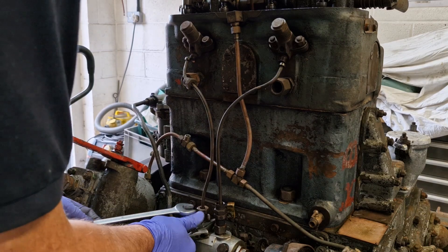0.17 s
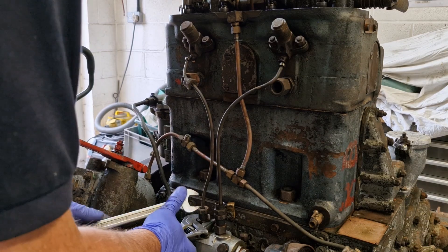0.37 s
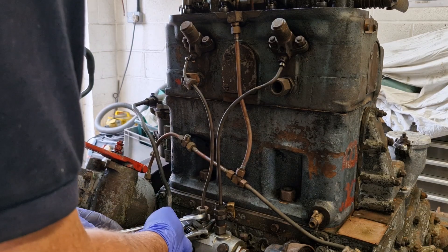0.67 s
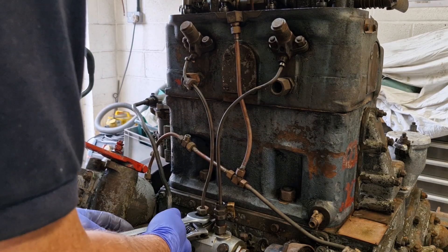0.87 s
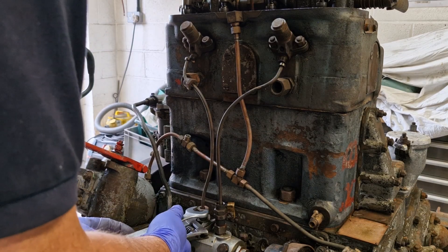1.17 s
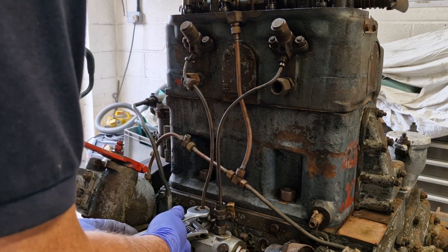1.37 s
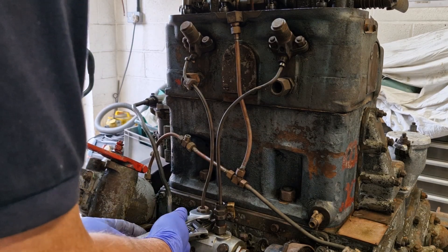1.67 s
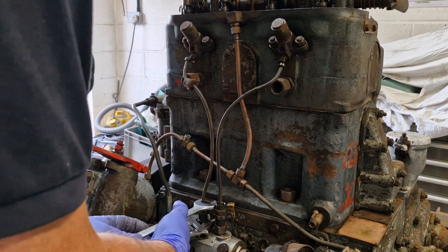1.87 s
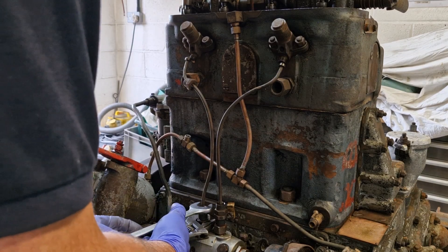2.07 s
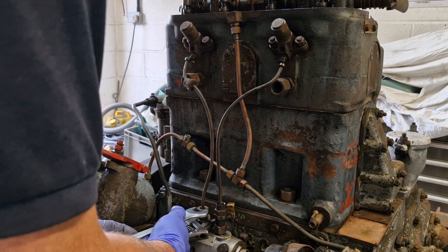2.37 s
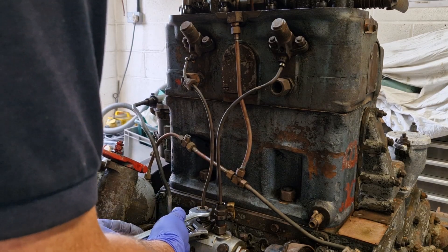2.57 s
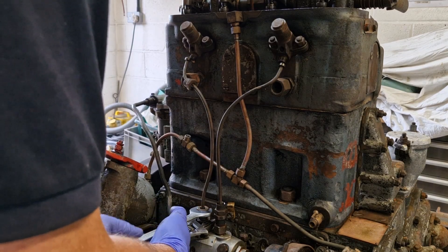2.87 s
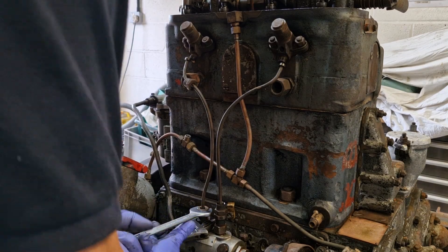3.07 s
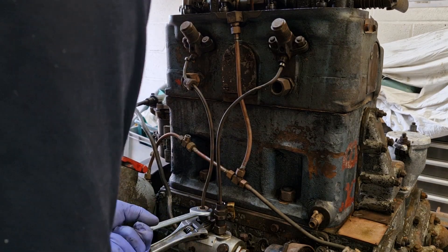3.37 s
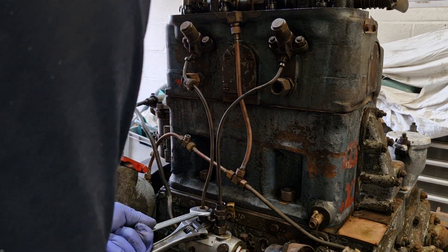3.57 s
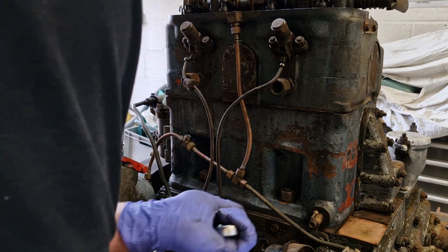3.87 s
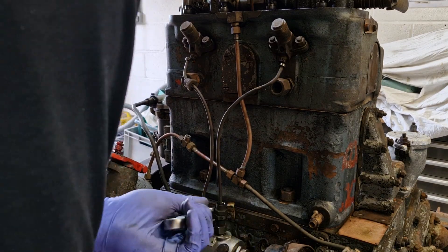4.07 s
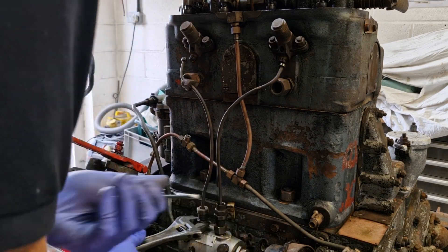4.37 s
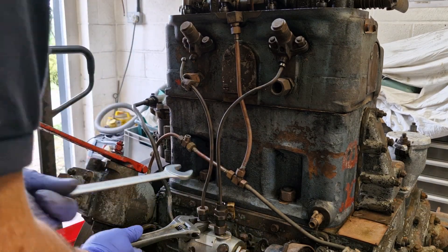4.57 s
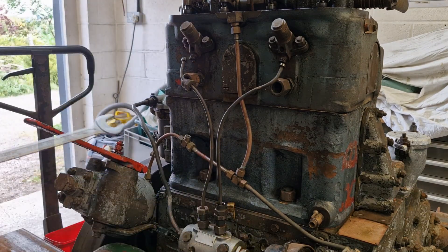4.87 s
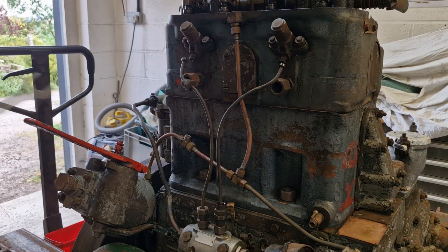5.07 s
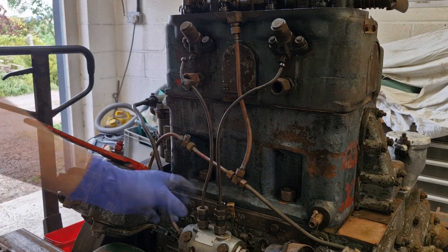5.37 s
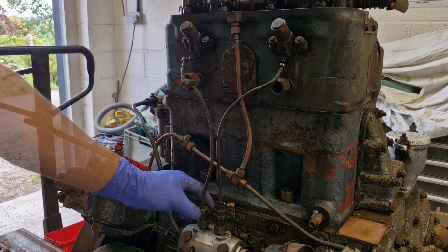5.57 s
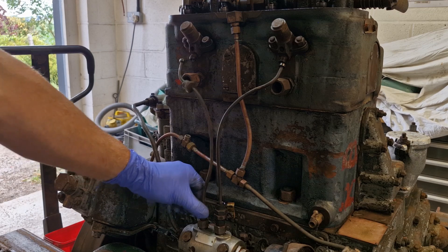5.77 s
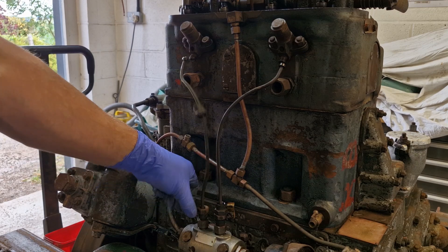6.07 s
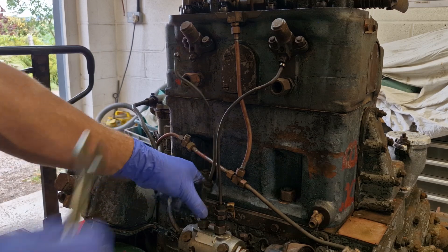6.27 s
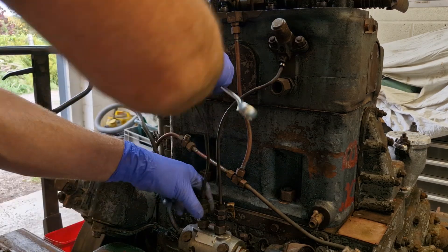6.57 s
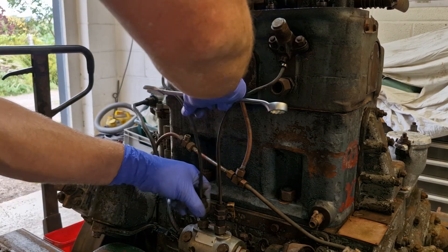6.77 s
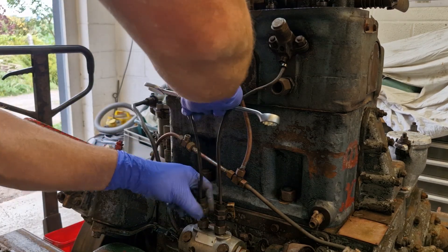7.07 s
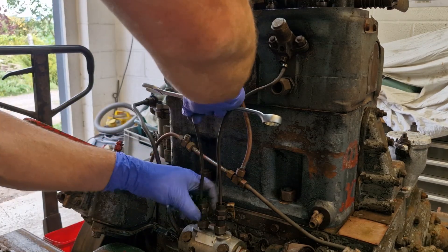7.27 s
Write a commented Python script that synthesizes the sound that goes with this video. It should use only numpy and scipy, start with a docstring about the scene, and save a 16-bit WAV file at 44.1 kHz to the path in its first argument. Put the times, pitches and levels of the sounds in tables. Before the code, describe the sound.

Close stereo pickup of hand tools on an old engine: a cluster of hard knocks and loose clinks, two solid thuds into the block, then very quiet jiggling and rubber-glove rustle. A jaw squeaks off the nut, soles shuffle on the floor, and a heavy spanner is dragged with grinding, skipping and high ringing. One more bright clank ends in light ticks and rustling. Distant pigeon coos and faint chirps, short hard-room reverberation.

```python
"""Spanner jaws clink on the nuts of a diesel fuel pipe union and knock through pipes into the block; pigeon and
small bird call outside the open door. Gloves rustle, a jaw squeaks, shoes shuffle, a long ring spanner is dragged
off a bench, ringing and clashing. Contacts: whitened noise cracks plus decaying modes; friction: uneven grains;
squeaks and calls: wavering sines. All but the air wash, floor thump and low air flutter get a noise-built room."""
import sys
import numpy as np
from scipy import signal
from scipy.fft import rfft, irfft
from scipy.io import wavfile
from scipy.ndimage import uniform_filter1d

SR = 44100
rng = np.random.default_rng(int(sys.argv[2]) if len(sys.argv) > 2 else 0)


def store_pcm(level_fs):
    """Save levels as 16-bit WAV."""
    pcm = np.round(np.clip(level_fs, -1, 1) * 32767).astype(np.int16)
    wavfile.write(sys.argv[1], SR, np.atleast_2d(pcm).T)


N = 327663
T = np.arange(N) / SR
CUT_HZ = 16200
AIR_DB = -68.5
# left minus right
ENGINE_PAN_DB, BENCH_PAN_DB = 1.5, 2.5
# thud, knock, clank, tick ranges: low edge/Hz, high edge/Hz
RANGES_HZ = [(150, 600), (600, 1500), (1500, 5000), (5000, 15000)]
# seated jaw: level/dB in each of the four ranges
KNOCK_DB = (-9.5, -1.5, -9.5, -25)
# modes of the long ring spanner, hanging free: f/Hz, level/dB, t60/s
RING_SPANNER_MODES = [(2455, -4, .3), (4038, 0, 1.2), (4743, 0, .45), (5469, -4, .2), (5868, -3, .6),
                      (7092, -1, .55), (7112, -1, .4), (7747, -2, .45), (8799, -10, .45), (9220, -10, 1.0),
                      (9800, -4, .3), (10800, -4, .2), (11203, -5, .5), (12146, -4, .65), (13150, -2, .14),
                      (14207, -8, .4), (14690, -11, .4), (15400, -6, .25)]


def undb(db):
    """Decibels to gain."""
    return 10 ** (np.asarray(db) / 20)


def unit(x):
    """Scale to rms 1."""
    return x / np.sqrt(np.mean(x ** 2) + 1e-30)


def band(x, lo_hz, hi_hz, order=4):
    """Causal band-pass."""
    sos = signal.butter(order, [lo_hz, min(hi_hz, SR / 2 - 1)], "band", fs=SR, output="sos")
    return signal.sosfilt(sos, x)


def colour(x, points):
    """Shape a steady sound by (f/Hz, level/dB) points, linear in log f."""
    hz, db = np.transpose(points)
    f = np.fft.rfftfreq(x.shape[-1], 1 / SR) + 1
    gain = undb(np.interp(np.log(f), np.log(hz), db))
    return irfft(rfft(x) * gain, x.shape[-1])


def add(out, start_s, x):
    """Mix x into out from start_s."""
    i = int(start_s * SR)
    out[..., i:i + x.shape[-1]] += x[..., :N - i]


def fade(t, t60):
    """Exponential decay, 60 dB down after t60."""
    return np.exp(-np.log(1000) * t / t60)


def panned(x, pan_db):
    """Lean a stereo sound to the left."""
    return x * undb(np.array([[pan_db], [-pan_db]]) / 2)


def air(side_db=-3):
    """Quiet outdoor wash and microphone hiss: coloured stereo noise."""
    # background spectrum: f/Hz, level/dB
    spectrum = [(25, -10), (60, 3.5), (110, -2.5), (200, -10.5), (300, 2), (450, -5), (800, -9),
                (1600, -16), (5000, -17), (9000, -23), (14000, -24), (16000, -64)]
    mid, side = colour(rng.standard_normal((2, N)), spectrum)
    return undb(AIR_DB) * unit(mid + undb(side_db) * side * np.array([[1], [-1]]))


def workshop(wet_db, lag_samples=2, treble_db=-3, build_s=0.00024, bass_hz=330):
    """Room response: direct sound, late on the right; then dense reflections, alike only in the bass."""
    # decay: f/Hz, t60/s
    decay_points = [(100, 0.35), (400, 0.46), (1200, 0.34), (4000, 0.34), (8000, 0.29), (15000, 0.23)]
    t = T[:SR // 2]
    f = np.fft.rfftfreq(len(t), 1 / SR)
    hz, t60 = np.transpose(decay_points)
    edges = np.geomspace(30, 22000, 13)
    mid, side = rfft(rng.standard_normal((2, len(t))))
    response = np.zeros((2, len(t)))
    for lo, hi in zip(edges, edges[1:]):
        apart = np.pi / 4 * hi / (hi + bass_hz)
        pair = np.cos(apart) * mid + np.sin(apart) * side * np.array([[1], [-1]])
        band_t60 = np.interp(np.log(hi), np.log(hz), t60)
        decay = fade(t, band_t60) * (1 - np.exp(-t / build_s))
        gain = undb(wet_db + treble_db * hi / edges[-1]) / np.linalg.norm(decay)
        response += gain * decay * irfft(pair * ((f >= lo) & (f < hi)), len(t))
    response[0, 0] += 1
    response[1, lag_samples] += 1
    return response


def heard(x, room):
    """A source as it reaches both microphones."""
    return signal.fftconvolve(x[None], room, axes=1)[:, :len(x)]


def weigh(x, levels_db, size):
    """Set each range's rms over the first samples: hard contacts bright, soft ones dull."""
    parts = [band(x, lo, hi) for lo, hi in RANGES_HZ]
    return sum(p * undb(db) / np.sqrt(np.mean(p[:, :size] ** 2)) for p, db in zip(parts, levels_db))


def tilted(levels_db, brightness, pivot_hz):
    """Tilt the four range levels about a pivot, brightness in dB/octave."""
    centres_hz = np.sqrt(np.prod(RANGES_HZ, axis=1))
    return np.array(levels_db) + brightness * np.log2(centres_hz / pivot_hz)


def ring(modes, t, scatter_db=0, favoured=(), favour_db=0, detune=0):
    """Decaying modes; strike place scatters their strengths and favours some; load detunes them."""
    hz, db, t60 = np.transpose(modes)
    db = db + scatter_db * rng.uniform(-2, 1, len(hz))
    hz = hz * (1 + detune * rng.standard_normal(len(hz)))
    for near_hz in favoured:
        db[np.argmin(abs(hz - near_hz))] += favour_db
    signed_gains = undb(db) * rng.choice([-1, 1], len(hz))
    return signed_gains @ (np.sin(2 * np.pi * hz[:, None] * t) * fade(t, t60[:, None]))


def chatter(rate_hz, spread_db, size=N):
    """Tiny contacts at random moments, of unequal size."""
    return (rng.random(size) < rate_hz / SR) * undb(spread_db * rng.uniform(-2, 1, size))


def rattled(t, crack_t60, rebound_db, rebound_t60=0.082):
    """Envelope of a loose jaw: one strike, then random rebounds that tend to weaken."""
    hits = undb(rebound_db) * chatter(rate_hz=490, spread_db=2.5, size=len(t)) * fade(t, rebound_t60)
    hits[0] = 1
    # each hit decays; energies add
    return np.sqrt(signal.lfilter([1], [1, -fade(2 / SR, crack_t60)], hits ** 2))


def burst(envelope):
    """Crack of one contact: enveloped noise, spectrum flattened, shaped again by the envelope's root."""
    spectrum = rfft(rng.standard_normal(len(envelope)) * envelope)
    flat = irfft(spectrum / abs(spectrum), len(envelope))
    return unit(flat * envelope ** .5)


def blow(room, levels_db, after_db, clack_hz=950, favoured=(), free_s=1, crack_t60=0.033,
         engine_db=-12, steel_db=2, clack_db=-5, clack_width=0.13, crack_lo_hz=250, dull_hz=6500,
         favour_db=7, after_favour_db=12, choke_t60=0.035, rebound_db=-15, pipe_favour_db=4):
    """Contact: crack with a broad clack, pipes and block, choked steel, after-ring choked from free_s."""
    # hand-held spanner modes: f/Hz, level/dB, t60/s
    spanner_modes = [(1600, -11, .1), (2030, -5, .08), (3100, -7, .07), (2498, -4, .28), (2758, -1, .2),
                     (3704, -5, .16), (4027, -9, .2), (4269, -3, .25), (4885, -2, .2), (5620, -5, .18),
                     (6100, -4, .2), (7033, -3, .33), (7855, -6, .17), (8230, -2, .24), (9530, -4, .24),
                     (10655, -4, .22), (11365, -4, .3), (11855, -5, .18), (12650, -1, .3), (13350, -6, .2),
                     (14620, -8, .14), (15280, -7, .15)]
    # pipe, pump and block modes: f/Hz, level/dB, t60/s
    engine_modes = [(271.3, -14, 0.17), (431.5, -11, 0.13), (703, -5, 0.052), (875, 4, 0.059),
                    (988, -0.5, 0.089), (1119, -8.5, 0.13), (1174, -2, 0.11), (1445, 1, 0.054),
                    (1644, -21, 0.69), (1968, -6.5, 0.13), (2280, -3.5, 0.078), (2680, -13, 0.29),
                    (3840, -12.5, 0.18)]
    t = T[:SR // 2]
    crack = burst(rattled(t, crack_t60, rebound_db))
    clack = unit(band(crack, clack_hz / (1 + clack_width), clack_hz * (1 + clack_width), order=2))
    pipes = unit(ring(engine_modes, t, scatter_db=2, favoured=[clack_hz], favour_db=pipe_favour_db,
                      detune=0.005))
    dull_crack = unit(band(crack, crack_lo_hz, dull_hz, order=3))
    body = unit(dull_crack + undb(clack_db) * clack + undb(engine_db) * pipes)
    # glove and nut choke the steel; favoured modes dominate the after-ring
    choke = fade(t, choke_t60)
    steel = ring(spanner_modes, t, scatter_db=1.5, favoured=favoured, favour_db=favour_db, detune=.004)
    after = ring(spanner_modes, t, scatter_db=1, favoured=favoured, favour_db=after_favour_db, detune=.001)
    after = after / np.std(after * choke) * fade(np.maximum(t - free_s, 0), choke_t60)
    steel = undb(steel_db) * unit(steel * choke) + undb(after_db) * after
    # spanner heard more directly than the engine: weaker reflections
    near = room * undb(np.where(t > .0002, -5, 0))
    return weigh(heard(body, room) + heard(steel, near), levels_db, size=1323)


def knocks():
    """Dull blows of a seated jaw: mostly pipes and block, little steel."""
    # t/s, level/dB, brightness/(dB/octave), after-ring/dB, clack f/Hz
    rows = [(.249, -34.5, 2, -15, 880), (.261, -41, 6, -11.5, 1220), (.271, -33.5, 1.5, 14, 2500),
            (.578, -41, 7, 6, 2560), (0.615, -42, 5.5, -25, 950), (1.575, -30, -1, -49, 929),
            (1.769, -48.5, 5.5, -19.5, 960), (1.789, -41, 2.5, -32, 890), (1.81, -42, -4.5, -23, 940),
            (2.53, -28, 1.5, -40, 1033), (2.772, -71.5, 3.5, -25, 1900), (3.017, -54.5, 6.5, -39, 1850),
            (3.047, -55, 3.5, -21, 1410), (4.231, -51.5, -1, -11, 880), (4.272, -54.5, 2.5, -25, 1460),
            (4.373, -52, -3.5, -27, 890), (4.383, -53.5, -2.5, -27, 930), (4.492, -60.5, -1, -32, 900),
            (4.534, -52, 2.5, -30, 920), (4.596, -60, 2, -30, 940), (5.18, -48, -2.5, -45, 745),
            (5.652, -37.5, 5, -53, 1810)]
    out, room = np.zeros((2, N)), workshop(wet_db=-2.0)
    for s, db, brightness, after_db, clack_hz in rows:
        levels_db = db + tilted(KNOCK_DB, brightness, pivot_hz=970)
        knock = blow(room, levels_db, after_db, clack_hz, favoured=[2498], free_s=0.0047,
                     after_favour_db=26.5, choke_t60=0.052, rebound_db=-9, engine_db=0.5,
                     steel_db=-8.5, clack_db=-2.5, crack_t60=0.084, dull_hz=9040)
        add(out, s, knock)
    return panned(out, ENGINE_PAN_DB)


def swell(t, length_s):
    """A rounded rise and fall."""
    return np.sqrt(np.maximum(np.sin(np.pi * t / length_s), 0))


def wavering(hz, waver, size):
    """Phase of a tone whose pitch trembles; waver is the rms share."""
    wobble = unit(uniform_filter1d(rng.standard_normal(SR), size=size))[:len(hz)]
    return 2 * np.pi * np.cumsum(hz * (1 + waver * wobble)) / SR


def calls(notes, waver, wet_db):
    """Gliding, nearly pure bird notes through the door: sine plus octave."""
    out = np.zeros(N)
    for s, length_s, first_hz, last_hz, db, octave_db in notes:
        t = T[:int(length_s * SR)]
        phase = wavering(np.linspace(first_hz, last_hz, len(t)), waver, size=200)
        tone = np.sin(phase) + undb(octave_db) * np.sin(2 * phase)
        add(out, s, undb(db) * swell(t, length_s) ** 2 * tone)
    return heard(out, workshop(wet_db))


def clinks(touch_s=0.033):
    """Bright loose-jaw contacts; the jaw touches down touch_s before the next, stopping the ring."""
    # t/s, level/dB, brightness/(dB/octave), share passed into pipes/dB, after-ring/dB, clack f/Hz,
    # steel over crack/dB, room/dB, three favoured modes f/Hz
    rows = [(.489, -34, 1, -15, -14, 1315, 0, 3, 4885, 11365, 12650),
            (.563, -34, -3.5, -25.5, -12, 2580, 9.5, 5.5, 2758, 4885, 7855),
            (.744, -37, -4, -40, 9, 4270, 10.5, 6, 2758, 4269, 10655),
            (.795, -33.5, 1.5, -18, -14, 3130, 6.5, 2.5, 2498, 10655, 13350),
            (1.145, -47.5, -5.5, -27, -31, 3260, 1, 1.5, 2758, 3704, 4885),
            (1.84, -50, 3, -15, -14, 4870, 15, 0, 4885, 7033, 12650),
            (1.936, -39.5, 4.5, 2, -30, 6120, 10, 0, 6100, 9530, 13350),
            (2.073, -55, -9, -43, -20, 2700, 18, 2, 1600, 2758, 4269),
            (2.301, -60, -8.5, -41, -26, 1760, -12, 1, 1600, 3704, 4885),
            (2.454, -57, -9, -36, -11, 3970, -4, 10, 1600, 3100, 4269),
            (3.893, -46.5, 7, 17.5, -30, 6940, -4, 1, 8230, 10655, 11855),
            (4.544, -60.5, -1, -6.5, -35, 2950, -2, -2, 2030, 4269, 6100),
            (4.831, -53.5, 8.5, 10, -28, 5500, 1, 1, 4885, 6100, 7033),
            (4.881, -51.5, -2, -26, -35, 4070, -1, -4, 3704, 4027, 4269),
            (5.819, -58.5, -1, -6.5, -27, 2330, 4, -7, 1600, 10655, 12650),
            (5.955, -56.5, 4, 6, -31, 4650, 5, 4, 4027, 5620, 7033),
            (6.6, -31.5, 7, -5.5, -1.5, 4100, 13.5, 3.5, 4269, 6100, 8230),
            (6.897, -42.5, 10.5, 13, -5, 12900, 7, 7, 4885, 7033, 12650),
            (7.03, -58.5, 5.5, 10.5, -17, 7350, -2, 4, 4885, 7033, 8230),
            (7.414, -49, 8.5, 6, -13, 6960, 6, -7, 4269, 7033, 8230)]
    # level/dB in each of the four ranges
    range_db = (2, -2.5, 0.5, 1)
    out = np.zeros((2, N))
    next_times = [row[0] for row in rows[1:]] + [np.inf]
    for row, next_s in zip(rows, next_times):
        s, db, brightness, pipes_db, after_db, clack_hz, steel_db, wet_db, *favoured = row
        # pipe share sets the two low ranges
        levels_db = db + tilted(range_db, brightness, pivot_hz=3080) + pipes_db * np.array([1, 1, 0, 0])
        free_s = max(next_s - s - touch_s, 0)
        clink = blow(workshop(wet_db), levels_db, after_db, clack_hz, favoured, free_s=free_s,
                     steel_db=steel_db)
        add(out, s, clink)
    return panned(out, ENGINE_PAN_DB)


def push(s, hold_s, attack_s, release_t60):
    """Envelope of one movement: straight rise, then exponential release from s + hold_s."""
    return np.clip((T - s) / attack_s, 0, 1) * fade(np.maximum(T - s - hold_s, 0), release_t60)


def jiggles(bright_db=2.0):
    """Faint irregular knocks while the jaw feels for its seat: one blow repeated at random."""
    # t/s, hold/s, relative level/dB
    rows = [(1.802, 0.1, -54.5), (2.693, 0.62, -77.5), (3.652, 0.22, -64.5)]
    effort = sum(undb(db) * push(s, hold_s, attack_s=0.0069, release_t60=0.29) for s, hold_s, db in rows)
    contact = blow(workshop(wet_db=1.5), tilted(KNOCK_DB, bright_db, pivot_hz=935), after_db=-34)
    return heard(effort * chatter(rate_hz=36, spread_db=-3), contact)


def grit(spread_db, grain_hz):
    """Friction noise: many tiny slips of very unequal size."""
    sizes = undb(spread_db * rng.standard_normal(N))[(T * grain_hz).astype(int)]
    return unit(sizes * rng.standard_normal(N))


def strokes(rows, colour_db, pivot_hz, ramp_s, slips, room):
    """Short gritty strokes of rubber and cloth: pressure rises, holds and falls."""
    out = np.zeros((2, N))
    for s, length_s, db, brightness, *_ in rows:
        length_s = max(length_s, ramp_s)
        t = T[:int(length_s * SR) + SR // 3]  # leaves space for the room tail
        pressure = np.clip(np.minimum(t, length_s - t) / ramp_s, 0, 1)
        stroke = pressure * np.roll(slips, -int(s * SR))[:len(t)]
        levels_db = db + tilted(colour_db, brightness, pivot_hz)
        add(out, s, weigh(heard(stroke, room), levels_db, size=int(length_s * SR)))
    return out


def rubs(gain_db=-1):
    """Gloves and sleeves rustle as gritty friction, reaching the left microphone first."""
    # t/s, length/s, relative level/dB, brightness/(dB/octave)
    rows = [(2.89, 0.044, -65, 6.5), (2.99, 0.18, -58, 3), (3.62, 0.043, -77, 13.5), (3.67, 0.13, -64, 1),
            (4.2, 0.057, -69.5, -3), (4.5, 0.087, -63.5, 0.5), (4.84, 0.21, -57, 1), (5, 0.22, -58.5, 0.5),
            (5.21, 0.081, -49.5, 2), (5.29, 0.26, -67.5, 0), (5.7, 0.21, -62, 1), (5.92, 0.075, -53, 1.5),
            (6.73, 0.6, -60.5, 2.5), (7.3, 0.12, -56, -0.5)]
    # relative level/dB in each of the four ranges
    range_db = (0.5, -3.5, -1, -7)
    slips, room = grit(spread_db=10.5, grain_hz=492.8), workshop(wet_db=26.0, lag_samples=8)
    return undb(gain_db) * strokes(rows, range_db, pivot_hz=2900, ramp_s=0.0039, slips=slips, room=room)


def squeaks():
    """Jaw squeaks off the nut: stick-slip locks to a resonance, a short tone with overtones."""
    # t/s, length/s, f/Hz, level/dB, pitch waver share
    rows = [(4.227, 0.029, 1477, -43.5, 0.072), (4.799, 0.025, 1405, -43.5, 0.032),
            (4.83, 0.011, 1484, -23, 0.013), (4.882, 0.0071, 1347, -31, 0.038),
            (4.881, 0.03, 1450, -33, 0.025), (4.9, 0.099, 1494, -43, 0.028)]
    # multiple of f, level/dB
    partials = [(1, -1), (2, -25), (3, -17), (4, -20)]
    out = np.zeros(N)
    for s, length_s, hz, db, waver in rows:
        t = T[:int(length_s * SR)]
        phase = wavering(np.full(len(t), hz), waver, size=120)
        tone = sum(undb(partial_db) * np.sin(k * phase) for k, partial_db in partials)
        add(out, s, undb(db) * swell(t, length_s) * tone)
    return heard(out, workshop(wet_db=-5))


def resonate(x, hz, width_hz):
    """One resonance whose centre may move: shift to 0 Hz, low-pass, shift back."""
    turn = np.exp(2j * np.pi * np.cumsum(hz) / SR)
    low_pass = signal.butter(2, width_hz / 2, fs=SR, output="sos")
    return (turn * signal.sosfilt(low_pass, x / turn)).real


def steps(gain_db=-1, floor_hz=140, floor_width_hz=60, sole_hz=290, sole_width_hz=120, sole_db=-14):
    """Soles scuff with a hollow note, duller than the cloth; their weight thumps the floor."""
    # t/s, length/s, relative scuff/dB, brightness/(dB/octave), low thump/dB
    rows = [(4.24, 0.044, -65.5, 2.5, -57), (4.346, 0.064, -63.5, 1, -57), (4.476, 0.042, -77, -4, -63),
            (5.166, 0.025, -40, -1, -49.5), (5.557, 0.092, -42, -2, -51), (5.881, 0.044, -42.5, -0.5, -61),
            (6.646, 0.044, -49, 3, -71), (7.096, 0.056, -42.5, 2, -51)]
    # relative scuff level/dB in each of the four ranges
    range_db = (-1, -11.5, -10, -15.5)
    slips, room = grit(spread_db=3.5, grain_hz=393.8), workshop(wet_db=9.0, lag_samples=8)
    slips = slips + undb(sole_db) * unit(resonate(slips, np.full(N, sole_hz), sole_width_hz))
    scuffs = strokes(rows, range_db, pivot_hz=296, ramp_s=0.014, slips=slips, room=room)
    weight = sum(undb(db) * push(s, length_s, attack_s=0.0056, release_t60=0.43)
                 for s, length_s, *_, db in rows)
    lo_hz, hi_hz = floor_hz - floor_width_hz / 2, floor_hz + floor_width_hz / 2
    thump = weight * unit(band(rng.standard_normal(N), lo_hz, hi_hz, order=1))
    return undb(gain_db) * scuffs + thump


def skips(effort, tap_db=0.0):
    """Dragged spanner hops over the bench: separate taps, each ringing its modes in a new mix."""
    out, t = np.zeros(N), T[:SR // 6]
    hops = effort * chatter(rate_hz=100, spread_db=4)
    for i in np.flatnonzero(hops > hops.max() / 60):
        steel = unit(ring(RING_SPANNER_MODES, t, scatter_db=5, detune=.004) * fade(t, t60=.11))
        tap = unit(band(burst(fade(t, t60=.014)), 1200, 5500, order=2))
        add(out, i / SR, hops[i] * (steel + undb(tap_db) * tap))
    return unit(out)


def dragging(edge_width_hz=150, rattle_db=-4.0, skip_db=-7, lurch_db=0.9):
    """Dragged steel grinds on the bench in uneven lurches, sings at its edge, skips over the wood."""
    # shoves: t/s, hold/s, relative level/dB
    shoves = [(6.023, 0.016, -29), (6.169, 0.17, -29), (6.351, 0.028, -26)]
    # bench response: f/Hz, level/dB
    bench_response = [(40, -13), (120, -5), (220, -10), (320, 3.5), (600, -4.5), (1300, -6.5), (2000, -2),
                      (3200, -9), (5500, -9.5), (8000, -17), (13000, -67), (16000, -53)]
    # edge resonance, moving with the overhang: t/s, f/Hz, relative level/dB
    edge_points = [(6.03, 1804, 1.5), (6.12, 1815, -13), (6.17, 1750, -13), (6.22, 1834, -4),
                   (6.27, 2080, -20), (6.37, 1880, -13), (6.405, 2520, -4), (6.48, 2420, -17)]
    effort = np.max([undb(db) * push(s, hold_s, attack_s=.012, release_t60=.33)
                     for s, hold_s, db in shoves], axis=0)
    lurches = undb(lurch_db * unit(uniform_filter1d(rng.standard_normal(N), size=220)))
    slips = effort * unit(lurches * grit(spread_db=7.0, grain_hz=300))
    s, hz, db = np.transpose(edge_points)
    edge = undb(np.interp(T, s, db)) * unit(resonate(slips, np.interp(T, s, hz), edge_width_hz))
    rattle = undb(rattle_db) * (unit(colour(slips, bench_response)) + undb(0.5) * edge)
    grinding = heard(rattle, workshop(wet_db=6.0, lag_samples=15))
    skipping = heard(undb(skip_db) * skips(effort), workshop(wet_db=-3, lag_samples=15))
    return np.std(slips) * (grinding + skipping)


def ring_spanner(crack_t60=0.014, ring_pan_db=6, favour_db=11, clang_db=2, clang_t60=0.026):
    """As it lifts, each clash cracks brightly and rings the long spanner in a different chord."""
    # clashes: t/s, ring/dB, clash/dB, three favoured modes f/Hz
    clashes = [(6.044, -46, -53, 4800, 5469, 7092), (6.161, -61, -45, 7600, 13150, 15400),
               (6.187, -46, -38, 9800, 11203, 13150), (6.197, -33.5, -32.5, 10800, 11203, 13150),
               (6.233, -43, -53, 4743, 7092, 14207), (6.264, -40.5, -36, 4743, 5469, 15400),
               (6.333, -39, -27.5, 11203, 14207, 15400), (6.379, -24.5, -31, 6870, 8799, 12146),
               (6.6, -41, -41, 4038, 9220, 14690)]
    # clash level/dB in each of the four ranges
    range_db = (-11.5, -15, -20, 2.5)
    free, cracks = np.zeros(N), np.zeros((2, N))
    room, t = workshop(wet_db=2.0), T[:SR // 2]
    for s, ring_db, clash_db, *favoured in clashes:
        note = ring(RING_SPANNER_MODES, T[:SR * 2], favoured=favoured, favour_db=favour_db, detune=.0002)
        add(free, s, undb(ring_db) * note / np.std(note[:SR // 20]))
        clang = unit(note[:len(t)] * fade(t, clang_t60))
        crack = burst(fade(t, crack_t60)) + undb(clang_db) * clang
        add(cracks, s, weigh(heard(crack, room), clash_db + np.array(range_db), size=1323))
    lifted = heard(free, workshop(wet_db=-12, lag_samples=15))
    return panned(lifted, ring_pan_db) + panned(cracks, BENCH_PAN_DB)


def draught(reach_s=6.21, reach_hold_s=0.39, reach_db=-49,
            puff_s=6.591, puff_hz=80, puff_width_s=0.0047, puff_db=-26):
    """Reach to the bench stirs a low flutter of air; one soft puff as the arm passes the microphones."""
    mid, side = band(rng.standard_normal((2, N)), 68, 99, order=2)
    reach = undb(reach_db) * push(reach_s, reach_hold_s, attack_s=0.036, release_t60=0.14)
    flutter = unit(mid + side * np.array([[1], [-1]])) * reach
    puff = np.sin(2 * np.pi * puff_hz * (T - puff_s)) * np.exp(-((T - puff_s) / puff_width_s) ** 2)
    return panned(flutter + undb(puff_db) * puff, pan_db=14.0)


def scene():
    """Tools, hands, feet, birds and the quiet workshop."""
    # pigeon: t/s, length/s, first f/Hz, last f/Hz, level/dB, octave overtone/dB
    coos = [(.25, .4, 416, 412, -53, -26), (1.03, .32, 418, 412, -53, -26), (1.67, .36, 428, 434, -51, -18),
            (2.38, .22, 437, 434, -52, -9), (5.41, .23, 510, 435, -50, -12)]
    # small bird: t/s, length/s, first f/Hz, last f/Hz, level/dB, octave overtone/dB
    chirps = [(1.05, .09, 4500, 3800, -66, -30), (4.66, .12, 4500, 3400, -67, -30)]
    pigeon = calls(coos, waver=.022, wet_db=-4)
    bird = calls(chirps, waver=.06, wet_db=3)
    union = knocks() + clinks() + jiggles() + squeaks()
    body = rubs() + steps() + draught()
    bench = dragging() + ring_spanner()
    return air() + union + pigeon + bird + body + bench


def record(dry):
    """The recorder cuts the top: steep low-pass at CUT_HZ."""
    return signal.sosfilt(signal.ellip(10, .2, 80, CUT_HZ, fs=SR, output="sos"), dry)


dry = scene()
out = record(dry)
store_pcm(out)
```